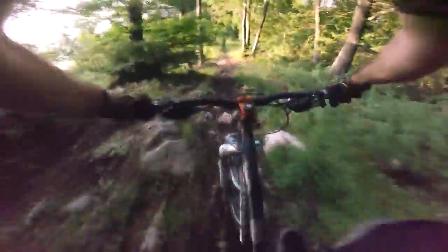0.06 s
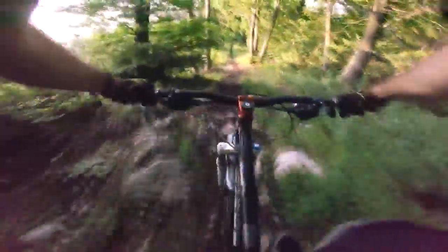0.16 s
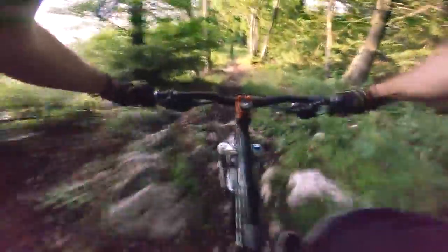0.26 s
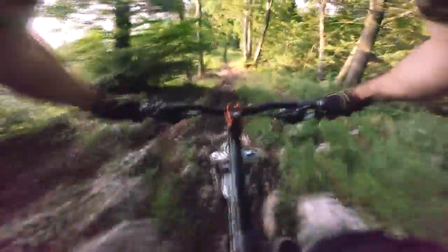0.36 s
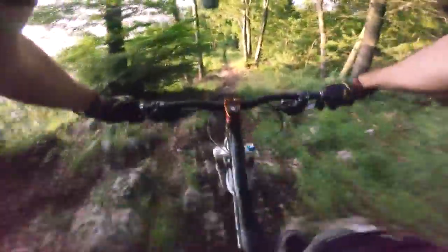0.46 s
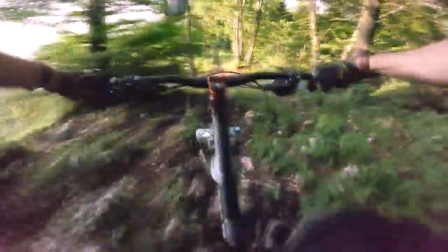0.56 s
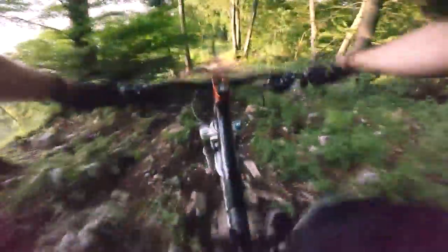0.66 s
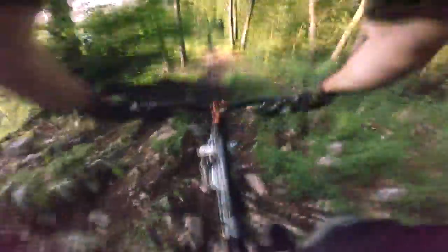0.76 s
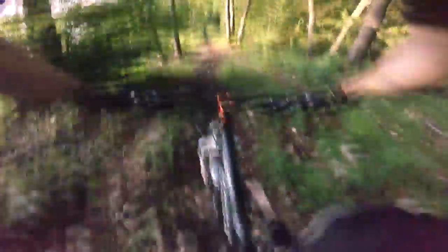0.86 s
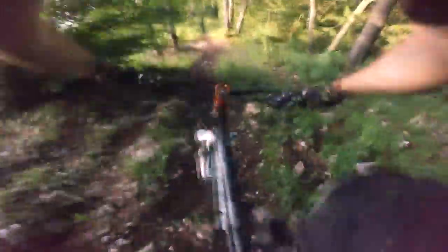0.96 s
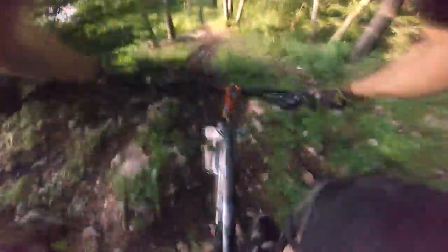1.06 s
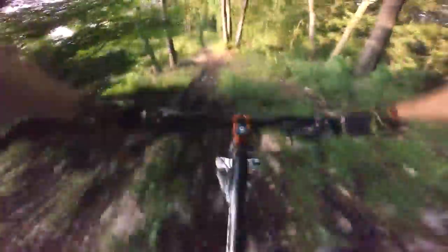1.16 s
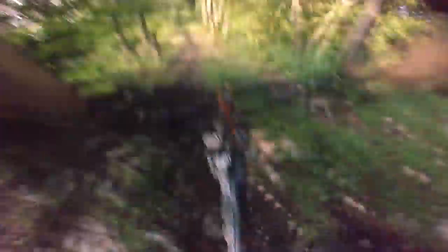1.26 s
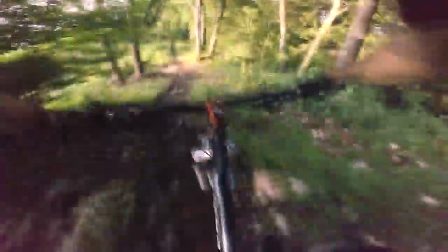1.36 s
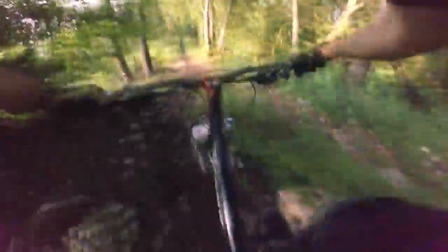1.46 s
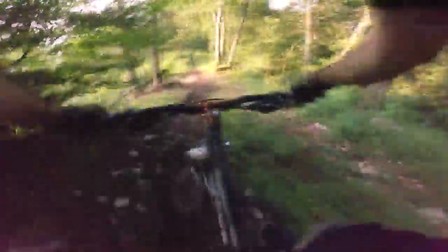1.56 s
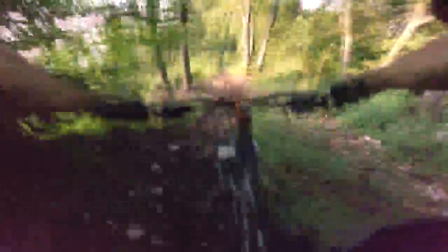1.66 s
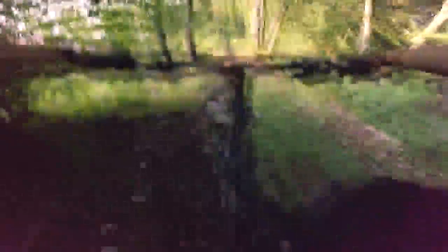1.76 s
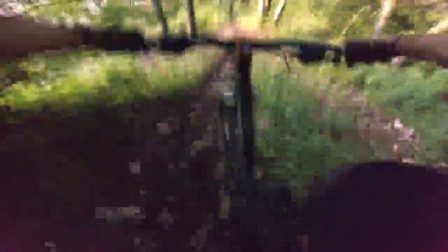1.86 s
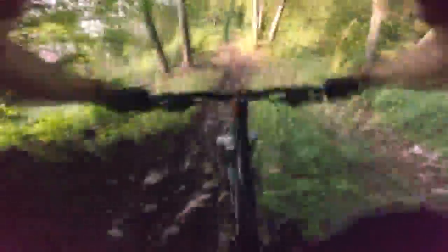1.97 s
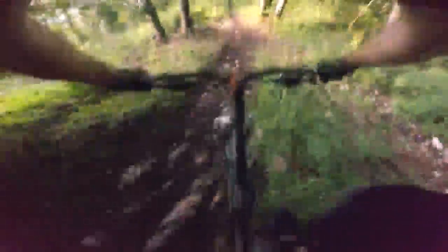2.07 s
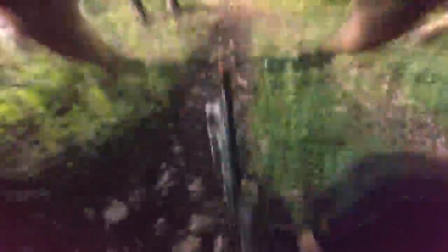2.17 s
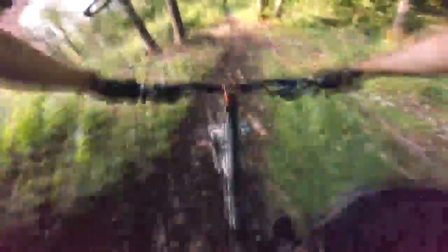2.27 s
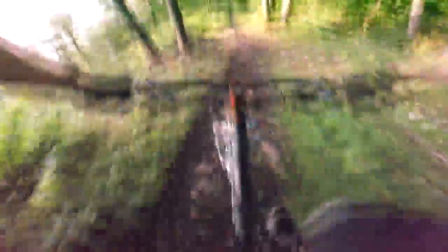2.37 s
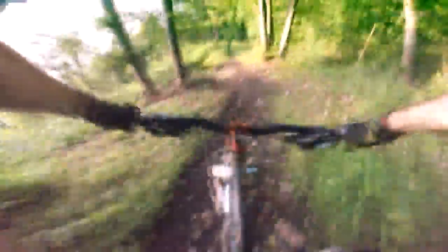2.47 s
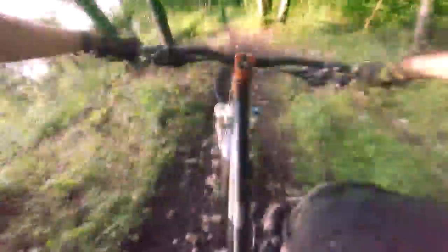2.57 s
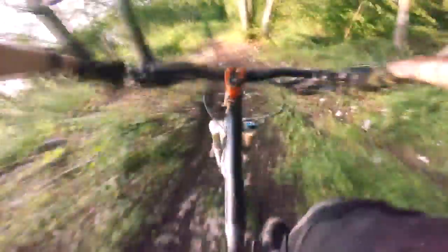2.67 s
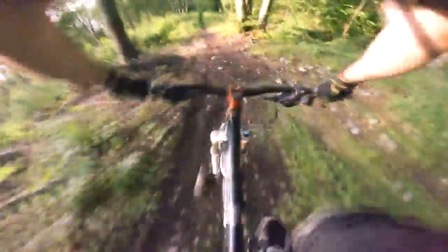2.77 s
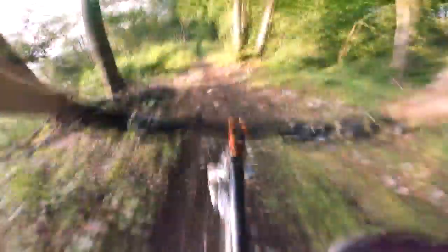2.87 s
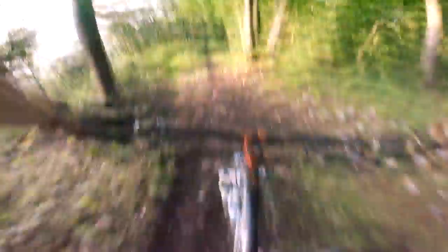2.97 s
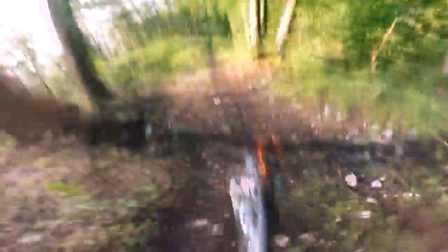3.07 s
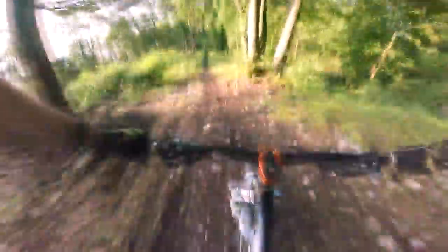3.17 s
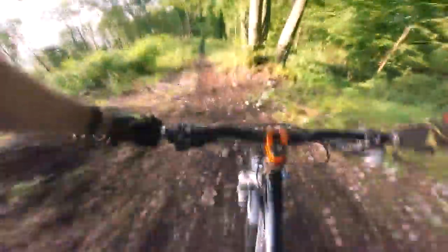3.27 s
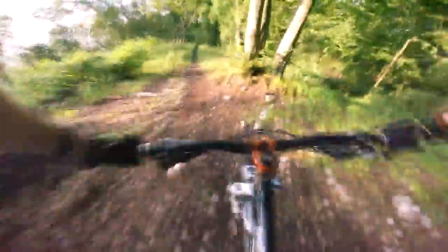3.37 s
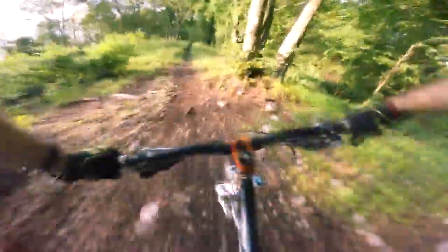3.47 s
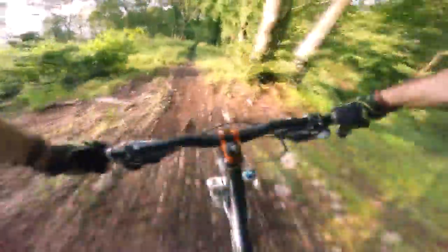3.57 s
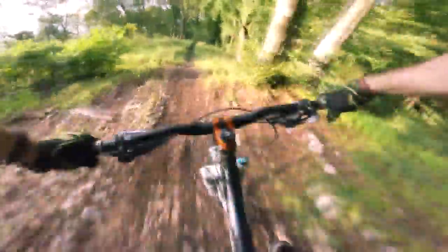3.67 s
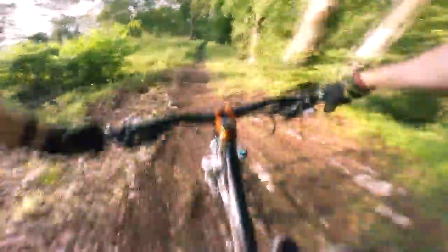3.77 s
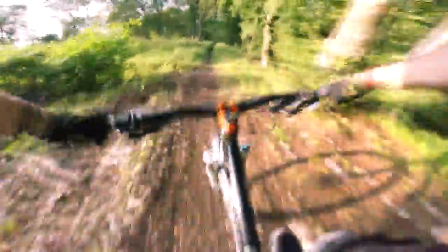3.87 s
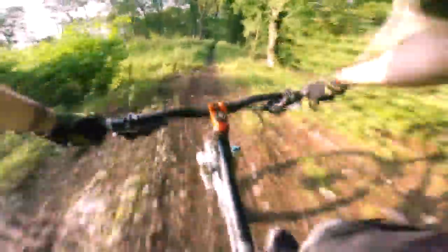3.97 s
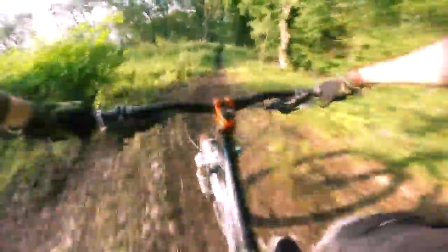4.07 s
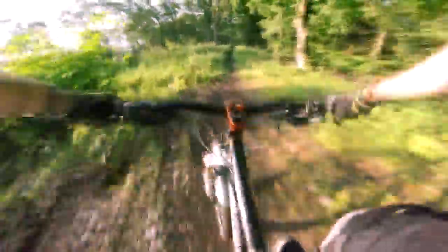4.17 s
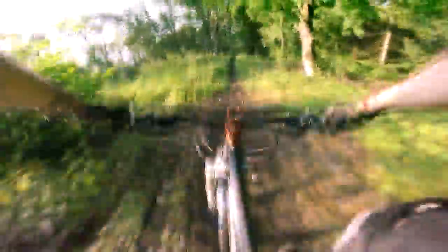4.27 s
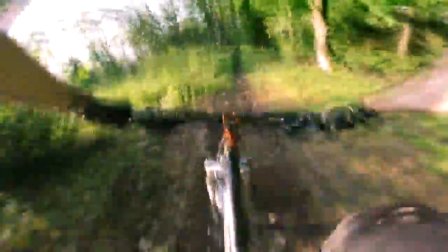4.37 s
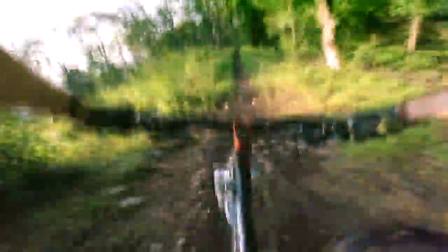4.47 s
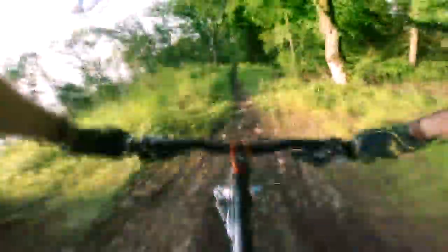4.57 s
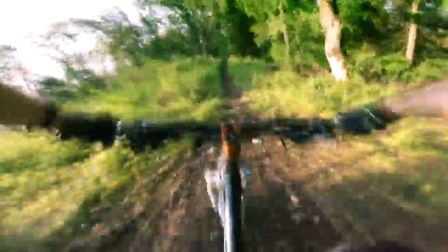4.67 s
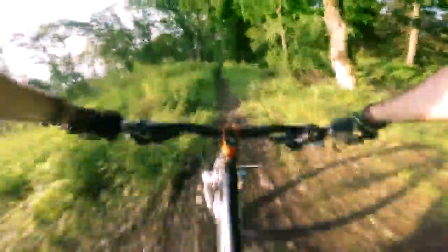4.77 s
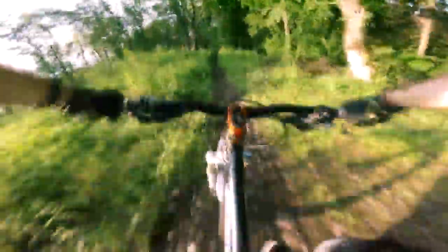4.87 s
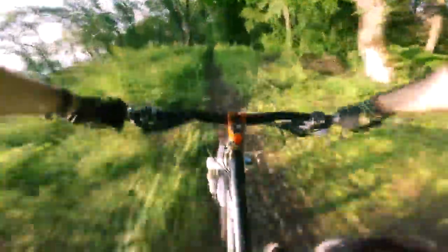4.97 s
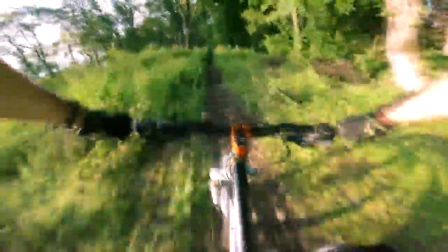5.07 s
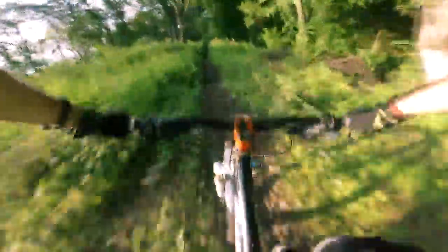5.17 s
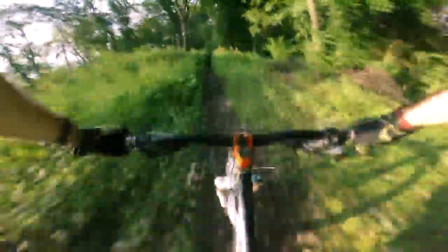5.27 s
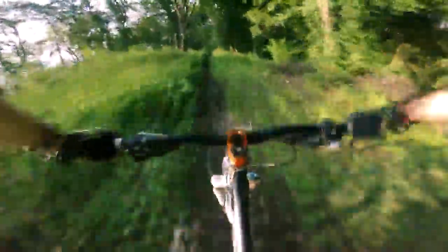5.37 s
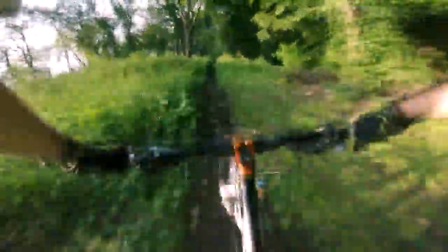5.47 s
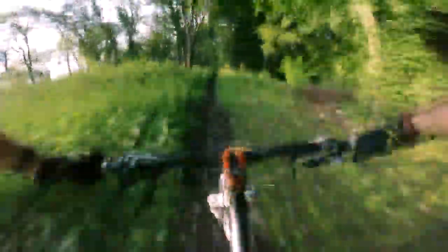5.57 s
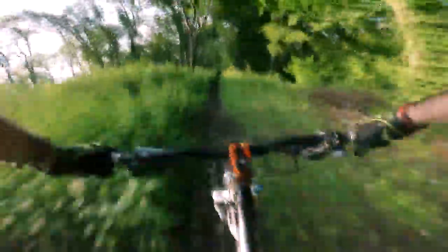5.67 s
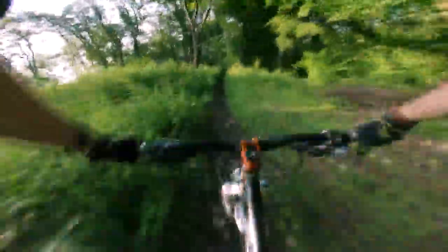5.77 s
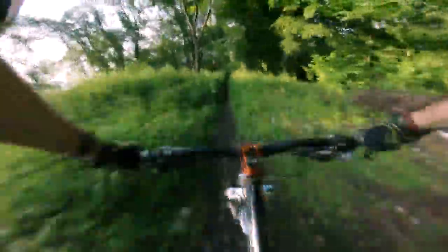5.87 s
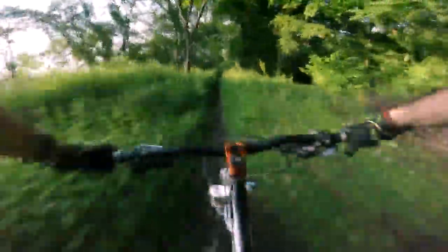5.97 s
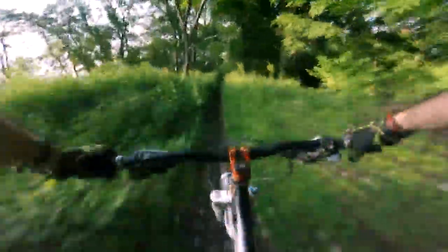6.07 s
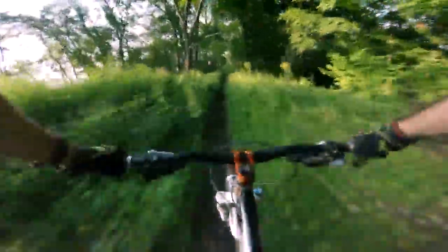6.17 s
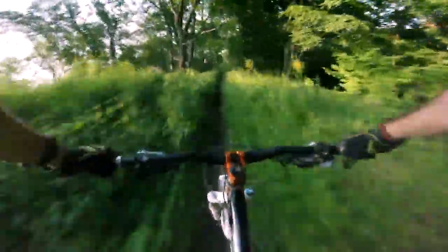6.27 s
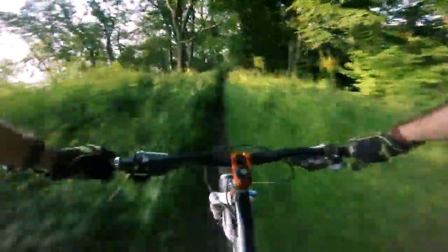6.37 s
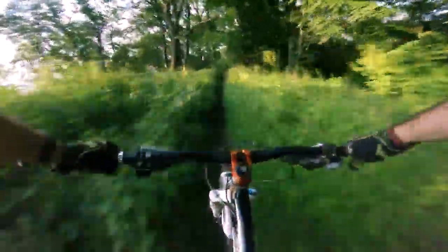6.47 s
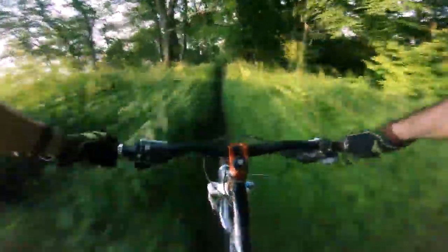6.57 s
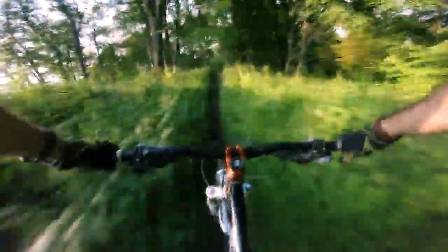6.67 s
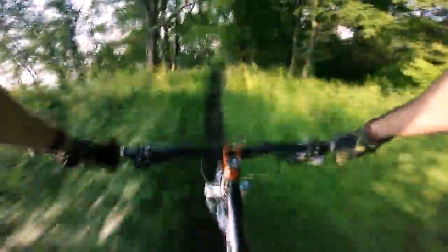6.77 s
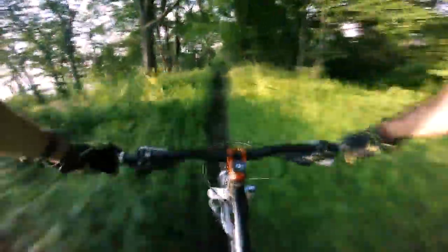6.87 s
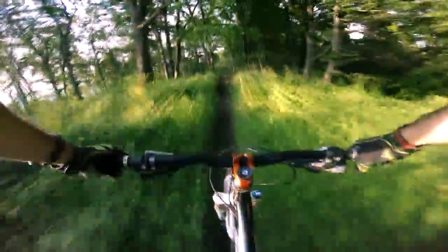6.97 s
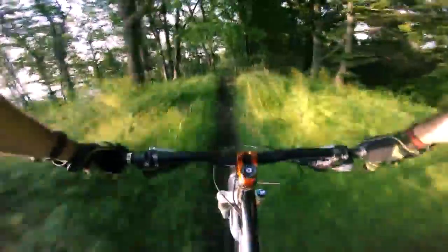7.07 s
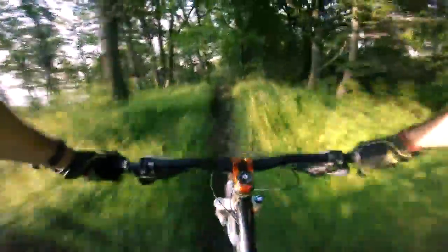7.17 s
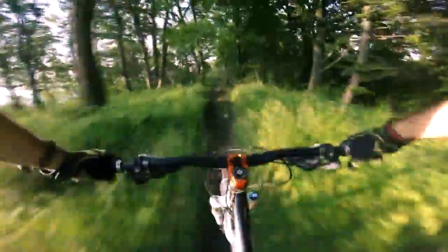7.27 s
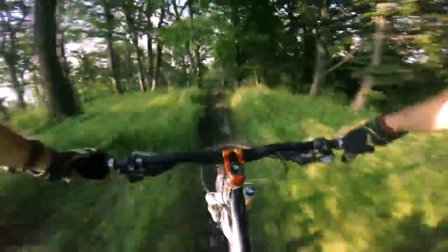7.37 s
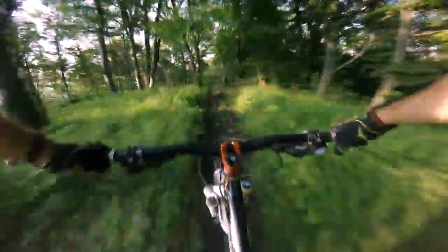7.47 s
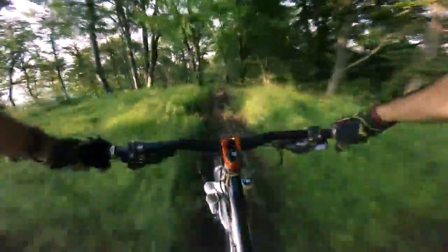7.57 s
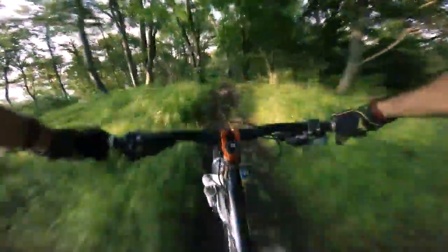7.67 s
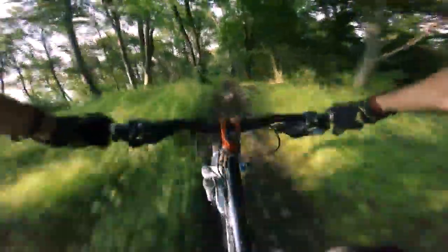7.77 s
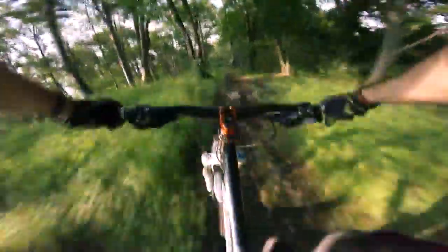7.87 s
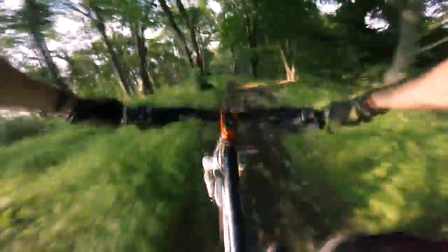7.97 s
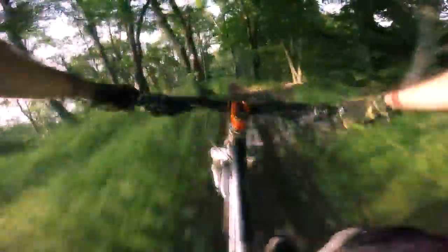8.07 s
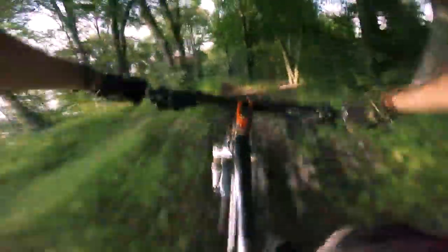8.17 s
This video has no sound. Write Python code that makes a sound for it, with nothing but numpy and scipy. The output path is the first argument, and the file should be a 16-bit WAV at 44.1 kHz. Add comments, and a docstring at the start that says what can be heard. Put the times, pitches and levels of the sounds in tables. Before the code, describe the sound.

Heard from a closed case on the rider's chest, a bicycle runs down a forest dirt trail. Low heaving and short rattles come first, then a dense run of boomy thumps over roots and stones with chain and cable clatter, hardest around two to three seconds. Afterwards only scattered knocks, slaps and pings remain over soft tyre rumble and very faint wind.

```python
"""First come low heaving and short rattles, then thumps and tyre rumble: a bicycle rides a rooty dirt trail.
The microphone sits shut in a hard case on the rider's chest, close to every blow and loose part.
Heave and tyres are shaped noise; roots, stones and pebbles ring the modes of chest and mount.
Chain, cables and clips are bursts of tiny contacts and narrow buzzes, coloured by the case resonances.
Behind them lie a faint rush of wind and one soft swish of grass on the frame."""
import sys
import numpy as np
from scipy import signal
from scipy.fft import rfft, irfft, next_fast_len
from scipy.io import wavfile

SR = 44100
rng = np.random.default_rng(int(sys.argv[2]) if len(sys.argv) > 2 else 0)


def pcm_store(signal):
    """Save signal as 16-bit PCM."""
    levels = np.round(np.clip(np.atleast_2d(signal), -1, 1) * 32767)
    wavfile.write(sys.argv[1], SR, levels.astype(np.int16).T)


N = 362061

# the ride along the trail: t/s, heave level/dB, reference level of the loose chatter/dB
RIDE = [(0, -20.5, -42), (0.35, -34, -49), (0.82, -34, -48), (0.9, -22, -45), (1.5, -23.5, -44.5),
        (2.25, -20, -45), (2.6, -22.5, -46), (2.82, -35, -43.5), (3.0, -20, -39.5), (3.38, -39.5, -49),
        (3.952, -30.5, -46.5), (4.251, -28.5, -42), (4.6, -24.5, -45.5), (5.1, -41, -47),
        (5.722, -21.5, -39.5), (5.95, -36, -47.5), (7.0, -37, -49), (8.21, -34.5, -49.5)]
# roots and stones under the wheels: t/s, peak level/dB, hardness/(dB per octave)
THUMPS = [(0.728, -19, 2.5), (0.859, -32, 13.5), (0.987, -14.5, -0.5), (1.063, -26, 0.5),
          (1.191, -27.5, 3.5), (1.357, -15, -7.5), (1.446, -15.5, -8.5), (1.46, -16.5, -2.5),
          (1.517, -20.5, -5), (1.552, -23, 1.5), (1.61, -21.5, -0.5), (1.652, -23, -4), (1.792, -13, -6.5),
          (1.845, -28, 11.5), (1.889, -17.5, -6.5), (1.942, -7.5, -2.5), (1.97, -22, 1.5),
          (2.037, -11, -3.5), (2.14, -21.5, 11), (2.217, -8, -1.5), (2.236, -12.5, 5.5),
          (2.266, -0.5, -17.5), (2.35, -11.5, -5.5), (2.418, -11.5, -14.5), (2.527, -15.5, -4),
          (2.587, -13, -0.5), (2.618, -22, 6.5), (2.631, -7.5, -12), (2.66, -26, 7), (2.731, -17, 3.5),
          (2.914, -22, 6.5), (2.978, -10, 7), (2.991, -1.5, -11), (3.097, -17, -0.5), (3.154, -11.5, -15),
          (3.791, -21, 2.5), (4.403, -24, 9.5), (4.498, -17.5, -10.5), (4.648, -16, -5),
          (5.151, -18.5, 0.5), (5.592, -21, 1), (6.76, -28.5, 0.5)]
# chain and clip slaps: t/s, drive level/dB, treble relative to it/dB, t60/ms
SLAPS = [(0.0504, -17.5, -19, 20), (0.083, -24.5, -13, 40), (0.153, -33, -3, 46), (0.173, -23.5, -11, 24),
         (0.2955, -32, -9, 92), (0.618, -35, -27, 15), (0.666, -26, -25, 12), (0.71, -27, -16, 22),
         (0.918, -32, -31, 145), (1.0132, -35, -35, 7.3), (1.25, -28, -7, 170), (1.3213, -19.5, 1, 100),
         (1.6287, -30.5, -8.5, 410), (1.8333, -27, 1, 29), (2.239, -25.5, -33, 130), (2.359, -31, -21, 120),
         (2.4845, -23.5, -7.5, 260), (2.559, -27, -4.5, 240), (2.69, -25.5, -10, 55),
         (2.778, -42, -14, 150), (2.868, -28, -20, 55), (2.934, -16, -2, 58), (2.994, -15.5, -15, 81),
         (3.0738, -27, -3.5, 72), (3.116, -8.5, -12.5, 13.7), (4.24, -25, -5.5, 21), (4.27, -28, -14, 26),
         (4.406, -14.5, -29, 13.4), (4.4246, -27.5, -17, 64), (4.4958, -14, -19.5, 35),
         (4.53, -13.5, -18, 28), (4.544, -23.5, -16, 160), (4.619, -23.5, -8.5, 200), (4.739, -36, 8, 49),
         (4.862, -33, -10, 49), (5.0211, -22, -13.5, 15), (5.4266, -19, -11, 9.8), (5.5137, -18, -19, 34),
         (5.6846, -22.5, -2, 51), (5.737, -23, -3.5, 110), (5.703, -27, -27, 83), (5.8837, -30, -1, 46),
         (5.917, -47.5, 13, 45), (6.121, -46, 11.5, 31), (6.2743, -21, -18, 14), (7.2205, -27, -16, 36),
         (7.423, -31, -9.5, 29), (7.7482, -45.5, 4, 8)]
# modes of chest and mount under a blow: f/Hz, level/dB before hardness, t60/s
MOUNT = [(47.3, -5.5, 0.032), (66, -5.5, 0.082), (96.4, 2.5, 0.066), (181.3, 1, 0.054), (317, -19.5, 0.071),
         (471.5, -17.5, 0.054), (687, -17.5, 0.036), (1030, -27.5, 0.015)]
# resonances of the case walls, two lower and two upper: f/Hz, width of one filter pass/Hz, level/dB
CASE_WALLS = [(1523, 394, 1.5), (2238, 510, 2), (2703, 1210, 2), (3396, 700, -2)]
# treble resonances of the case: f/Hz, width of one filter pass/Hz, level/dB
CASE_TREBLE = [(4980, 1340, 8.5), (5960, 1430, 7), (8200, 5800, 2), (10500, 1000, -7.5),
               (12100, 7500, -10.5)]
# spectrum of the tyre rumble: f/Hz, relative level per Hz/dB
RUMBLE_SPECTRUM = [(45, -2.5), (110, -6), (200, -10.5), (330, -20.5), (700, -25)]
# spectrum of the wind at the case: f/Hz, relative level per Hz/dB
WIND_SPECTRUM = [(200, 1), (950, 3), (4000, -18), (9000, -47), (14800, -21)]
# grass sweeping the frame: t/s, length/s, level/dB
GRASS_SWEEPS = [(6.988, 0.1, -50.5)]
# loose parts ringing on one note: t/s, peak level/dB, f/Hz, t60/ms
PINGS = [(1.237, -34.5, 3430, 190), (2.937, -20, 3370, 48), (3.075, -21, 3320, 18), (3.5455, -31, 2550, 24),
         (4.547, -23, 1610, 44), (6.609, -36.5, 1590, 49), (7.942, -37, 1580, 35), (7.994, -53, 12500, 40)]
# notes of the small random pings, before detuning: f/Hz
PING_NOTES_HZ = [1534, 2150, 2610, 3410]

WIND_DB = -59.5   # at the mean rumble level
# rumble at mean heave and chatter once up to speed; rough ground shakes all three together (dB per dB)
RUMBLE_DB, RUMBLE_PER_HEAVE, RUMBLE_PER_CHATTER = -46, 0.13, 0.26
SLOW_DB, SPEED_UP_S = -6, 1   # the wheels roll softer until the bicycle has gathered speed
PEBBLES_PER_S = 5
PEBBLE_DB, PEBBLE_PER_HEAVE = -30.5, 0.82   # centre level at mean heave; dB per dB
PEBBLE_SPREAD_DB = 7   # full range around the centre
PEBBLE_SOFTEST, PEBBLE_HARDEST = -7, 0   # dB per octave
PINGS_PER_S = 15
PING_DB, PING_T60_MS = 5, 14.7   # small pings: centre level above the chatter, decay
PING_WIDTH_HZ = 99
OVERLOAD = 0.92   # ceiling of the rounding, full scale 1
CUTOFF_HZ = 15350   # the low-pass is 60 dB down from here up


def from_db(db):
    """Amplitude ratio of a level in dB."""
    return 10 ** (np.asarray(db) / 20)


def rms_one(x):
    """Scale to rms 1."""
    return x / np.sqrt(np.mean(x ** 2) + 1e-20)


def drift(rate_hz):
    """Slow chance of rms 1: noise at every 40th sample through a double one-pole low-pass."""
    r = np.exp(-80 * np.pi * rate_hz / SR)
    noise = rng.standard_normal(N // 40 + 2002)
    slow = signal.lfilter([1], [1, -2 * r, r * r], noise)[2000:]   # drop the filter's start
    return np.interp(np.arange(N) / 40, np.arange(len(slow)), rms_one(slow))


def coloured_noise(spectrum):
    """Noise with the given spectrum, joined on a log frequency scale; rms 1."""
    size = next_fast_len(N)
    hz, db = np.transpose(spectrum)
    bins_hz = np.arange(size // 2 + 1) * SR / size
    shape_db = np.interp(np.log(bins_hz + 1), np.log(hz), db, left=-90, right=-90)
    return rms_one(irfft(rfft(rng.standard_normal(size)) * from_db(shape_db), size)[:N])


def resonate(drive, cracks, peaks, uneven_db):
    """Single cracks and dense tiny contacts ring each resonance, caught unevenly from moment to moment."""
    out = 0
    for k, (hz, width, db) in enumerate(peaks):
        r = np.exp(-np.pi * width / SR)
        catch = from_db(uneven_db * drift(22.3))
        contacts = catch * drive * rng.standard_normal(N)
        struck = from_db(db) * (contacts + (-1) ** k * cracks)
        b = np.array([1, 0, -1]) * (1 - r * r) / 2
        a = [1, -2 * r * np.cos(2 * np.pi * hz / SR), r * r]
        ring = signal.lfilter(b, a, signal.lfilter(b, a, struck))   # twice: steep flanks, dark valleys
        out = out + ring * 2 / np.sqrt((1 - r * r) * len(peaks))
    return out


def fade(x, t60_s):
    """Every click starts at once and dies away exponentially."""
    return signal.lfilter([1], [1, -from_db(-60 / (t60_s * SR))], x)


def wind(rumble_db):
    """Air rushes past the closed case, smooth and faint, a little stronger where the rumble is."""
    level_db = WIND_DB + 0.46 * (rumble_db - rumble_db.mean())
    return from_db(level_db) * coloured_noise(WIND_SPECTRUM)


def grass():
    """Grass sweeps the frame: a soft swish of high noise that swells and fades."""
    sweep = np.zeros(N)
    for s, length, db in GRASS_SWEEPS:
        swell = np.hanning(int(length * SR))
        at = round(s * SR)
        sweep[at:at + len(swell)] = from_db(db) * swell
    return sweep * coloured_noise([(3500, -5), (5000, -5), (12500, -23)])


def heave(level_db):
    """The rider's chest pumps the air in the case, in uneven lumps of 6 to 27 Hz noise."""
    band = signal.butter(2, [6.0, 27.0], "band", fs=SR, output="sos")
    swell = signal.sosfilt(band, rng.standard_normal(N + SR))[SR:]
    lumps = from_db(2.2 * drift(12.0))
    return from_db(level_db) * rms_one(swell * lumps)


def tyres(level_db):
    """Knobbed rubber on dirt: a rumble that lurches with the small bumps, more so on rough ground."""
    lurch_db = np.clip(3.5 + 0.48 * (level_db - level_db.mean()), 0, 6)
    return from_db(level_db + lurch_db * drift(26.0)) * coloured_noise(RUMBLE_SPECTRUM)


def pebbles(rough_db):
    """Small bumps come at random, stronger where the ground is rough: rows like those of the roots."""
    place, spread, hardness = rng.random((round(PEBBLES_PER_S * N / SR), 3)).T
    at = (place * N).astype(int)
    db = PEBBLE_DB + PEBBLE_PER_HEAVE * rough_db[at] + PEBBLE_SPREAD_DB * (spread - 0.5)
    hardness_db = np.interp(hardness, (0, 1), (PEBBLE_SOFTEST, PEBBLE_HARDEST))
    return np.transpose([at / SR, db, hardness_db]).tolist()


def thumps(blows):
    """A blow rings chest and mount; a hard stone favours the upper modes, a landing the lower."""
    out = np.zeros(N + SR)
    t = np.arange(int(0.15 * SR)) / SR
    chance = rng.standard_normal((len(blows), len(MOUNT), 2))
    judder = np.pad(drift(137.0), (0, SR))   # the loose upper modes judder into a rough crunch
    for (s, db, hardness_db), draws in zip(blows, chance):
        at = round(s * SR)
        thud = 0
        for (hz, level_db, t60), (detune, catch) in zip(MOUNT, draws):
            # rubber gives, and each mode takes half a cycle to build
            rise_s = 0.5 / hz + 0.0021
            swell = np.sin(np.pi / 2 * np.minimum(t / rise_s, 1)) ** 2
            tilt_db = hardness_db * np.log2(min(hz, 450) / 130)
            gain = from_db(level_db + tilt_db - 60 * t / t60)
            if hz > 250:
                gain = gain * from_db(2 * catch) * (0.4 + 0.8 * judder[at:at + len(t)])
            thud = thud + swell * gain * np.sin(2 * np.pi * hz * (1 + 0.06 * detune) * t)
        push = np.sign(draws[0, 1])   # either polarity
        out[at:at + len(t)] += push * from_db(db) * thud / np.abs(thud).max()
    return out[:N]


def pings(chatter_db):
    """A loose part buzzes briefly on one narrow note; small ones come at random, the low note most often."""
    place, note, size, detune = rng.random((round(PINGS_PER_S * N / SR), 4)).T
    at = (place * N).astype(int)
    choice = (note ** 2 * len(PING_NOTES_HZ)).astype(int)
    small_hz = np.array(PING_NOTES_HZ)[choice] * (0.97 + 0.06 * detune)
    small_db = chatter_db[at] + PING_DB + 8.0 * (size - 0.5)
    small = zip(at / SR, small_db, small_hz, np.full(len(at), PING_T60_MS))
    out = np.zeros(N + SR)
    ms = np.arange(int(0.15 * SR)) / SR * 1000
    r = np.exp(-np.pi * PING_WIDTH_HZ / SR)
    for s, db, hz, t60_ms in [*PINGS, *small]:
        envelope = np.minimum(ms / (0.075 * t60_ms), 1) * from_db(-60 * ms / t60_ms)
        buzz = envelope * rng.standard_normal(len(ms))
        ring = signal.lfilter([1, 0, -1], [1, -2 * r * np.cos(2 * np.pi * hz / SR), r * r], buzz)
        start = round(s * SR)
        out[start:start + len(ms)] += from_db(db) * ring / np.abs(ring).max()
    return out[:N]


def rattle(chatter_db, blows):
    """Slaps and small loose knocks are bursts of tiny contacts, heard through the case."""
    # rows: lower wall modes, upper wall modes, treble
    drive, cracks = np.zeros((3, N + SR)), np.zeros((3, N))
    ms = np.arange(int(0.2 * SR)) / SR * 1000
    stutter_db = np.pad(drift(87.0), (0, SR))   # a long slap breaks up into separate hits
    for s, db, treble_db, t60_ms in SLAPS:
        length, at = max(t60_ms, 8), round(s * SR)
        lean_db = 0.4 * (treble_db + 14.0)   # bright slaps lean to the upper wall modes, dull ones to the lower
        gains = from_db([db - lean_db, db + lean_db, db + treble_db])
        swell = np.minimum(ms / (0.063 * length), 1)   # long slaps swell in
        dying_db = np.outer([1, 1, 1.5], 60 * ms / length)   # the treble dies sooner
        breakup_db = 4.1 * min(length / 70, 1) * stutter_db[at:at + len(ms)]
        drive[:, at:at + len(ms)] += gains[:, None] * swell * from_db(-10.0 - dying_db + breakup_db)
        cracks[:, at] = gains * 2.7 * min(1, (8.8 / length) ** 2)   # short ones open with one hard crack

    # a hard blow also jolts the lower wall modes with a tick and a short crunch
    for s, db, hardness_db in blows:
        at = round(s * SR)
        cracks[0, at] += from_db(db + 2.3 * hardness_db - 17.0)
        drive[0, at:at + len(ms)] += from_db(db + 1.26 * hardness_db - 27.0 - 60 * ms / 57.0)

    # small knocks at random, a few much louder than the rest
    busy_db = chatter_db - chatter_db.mean()
    knocks_per_s = 90.0 * from_db(4.0 * drift(5) + 0.6 * busy_db)
    born = rng.random(N) < knocks_per_s / SR
    sizes = born * from_db(3.44 * np.minimum(rng.exponential(1, N), 2.5))
    bright = rng.random(N) ** 3 * from_db(5.5)   # few knocks reach the treble
    bed = from_db(chatter_db)
    # the finest hiss follows the ground only in part
    steady = from_db(0.74 * chatter_db + 0.41 * chatter_db.mean())
    loose = bed * (0.34 * from_db(0.56 * drift(42.0)) + 0.35 * fade(sizes, 0.0063))
    cracks[2] += 0.92 * bed * sizes * bright
    cracks[:2] += 1.8 * bed * sizes   # each knock opens with a tick
    bright_knocks = 0.14 * bed * from_db(0.99 * busy_db) * fade(sizes * bright, 0.02)
    treble = drive[2, :N] + from_db(-7.5) * (0.32 * steady + bright_knocks)

    lower = resonate(drive[0, :N] + loose, cracks[0], CASE_WALLS[:2], uneven_db=3.0)
    upper = resonate(drive[1, :N] + loose, cracks[1], CASE_WALLS[2:4], uneven_db=3.0)
    return (lower + upper) / np.sqrt(2) + resonate(treble, cracks[2], CASE_TREBLE, uneven_db=2.4)


def scene():
    """Heave and chatter follow the ride; rough ground also drives rumble, pebbles and wind."""
    t = np.arange(N) / SR
    ride_s, *columns = np.transpose(RIDE)
    heave_db, chatter_db = [np.interp(t, ride_s, column) for column in columns]
    rough_db = heave_db - heave_db.mean()
    busy_db = chatter_db - chatter_db.mean()
    slow_db = SLOW_DB * np.clip(1 - t / SPEED_UP_S, 0, 1)
    rumble_db = RUMBLE_DB + slow_db + RUMBLE_PER_HEAVE * rough_db + RUMBLE_PER_CHATTER * busy_db
    blows = THUMPS + pebbles(rough_db + 2 * slow_db)
    background = wind(rumble_db) + grass()
    ground = heave(heave_db) + tyres(rumble_db) + thumps(blows)
    loose_parts = pings(chatter_db) + rattle(chatter_db, blows)
    return (background + ground + loose_parts)[None]


def record(dry):
    """The loudest blows are rounded, the top is cut."""
    rounded = dry / (1 + np.abs(dry / OVERLOAD) ** 4) ** 0.25
    low_pass = signal.cheby2(12, 60, CUTOFF_HZ, fs=SR, output="sos")
    return signal.sosfilt(low_pass, rounded)


dry = scene()
out = record(dry)
pcm_store(out)
```